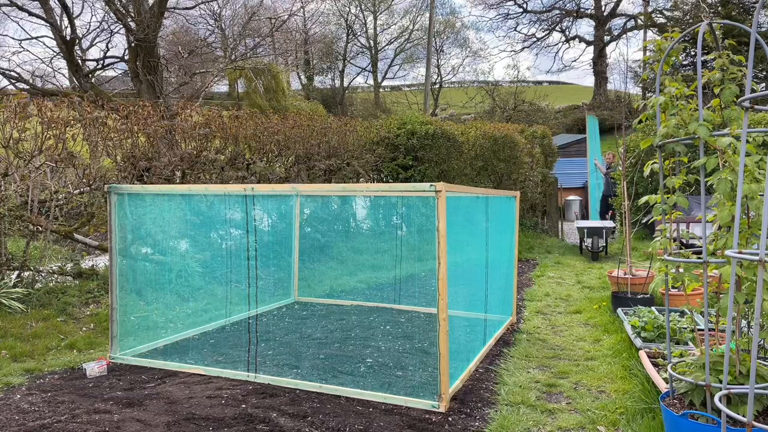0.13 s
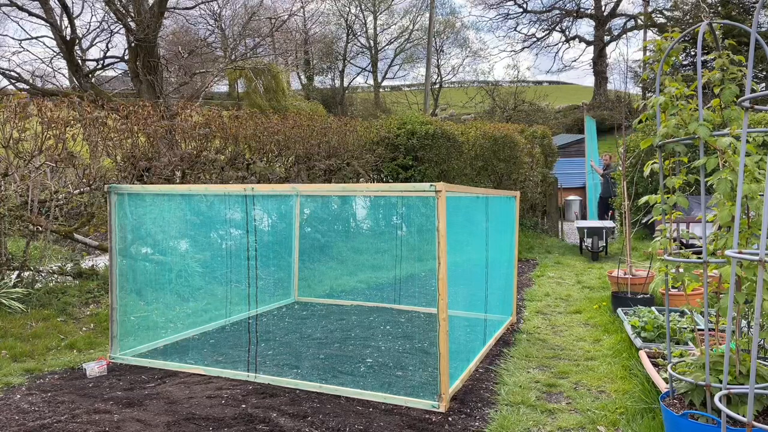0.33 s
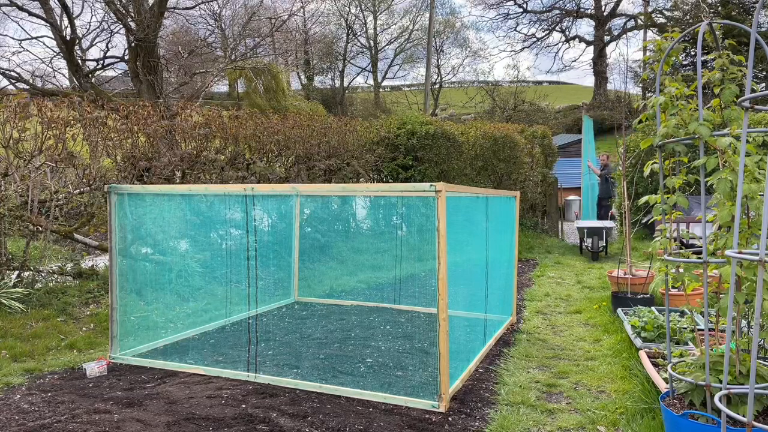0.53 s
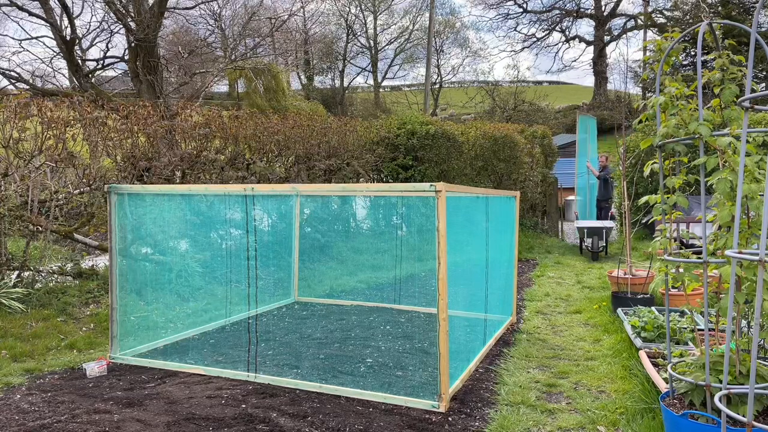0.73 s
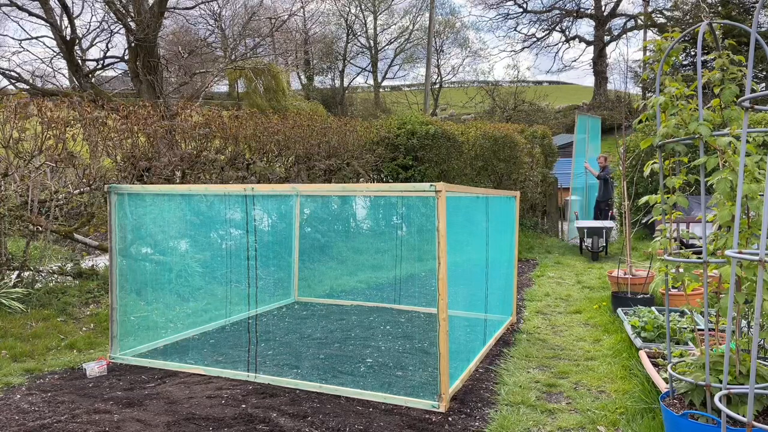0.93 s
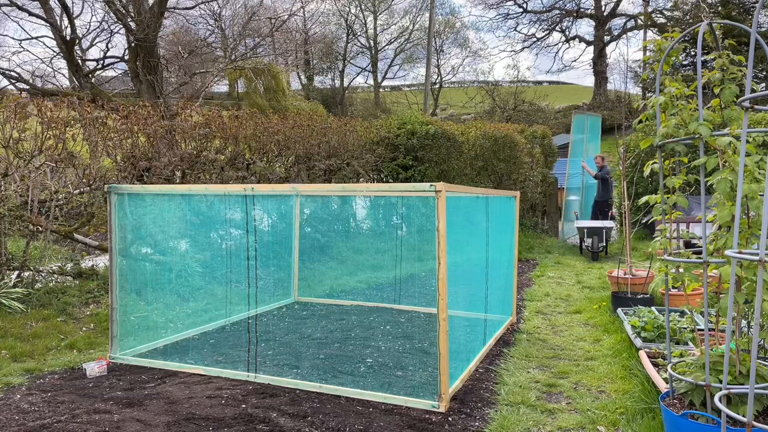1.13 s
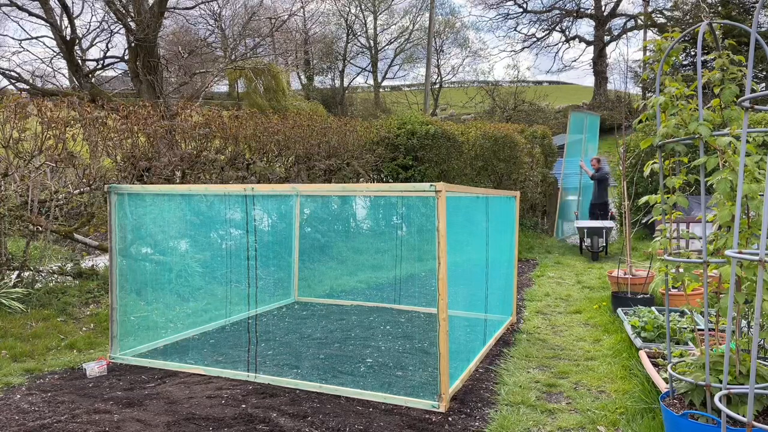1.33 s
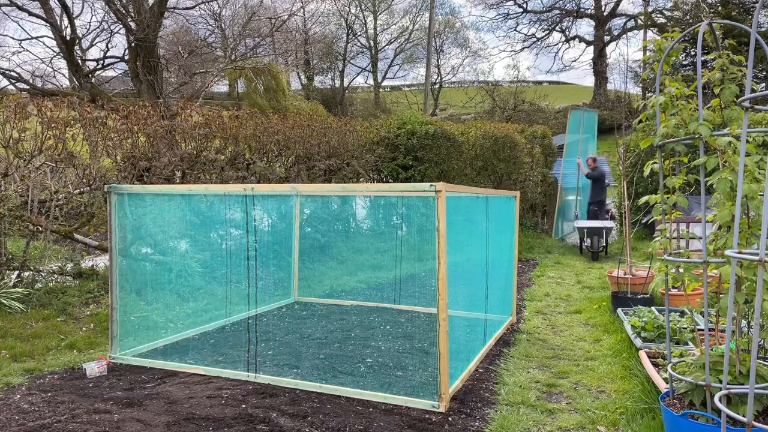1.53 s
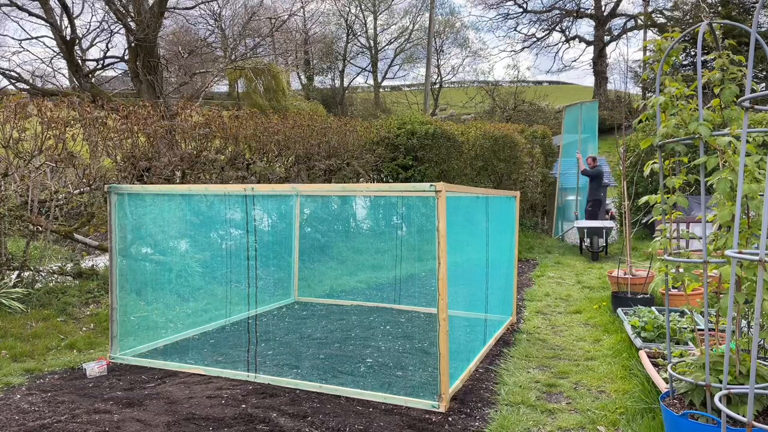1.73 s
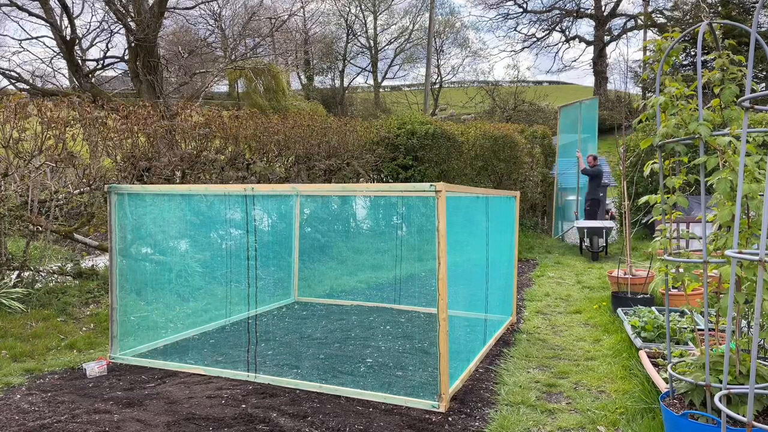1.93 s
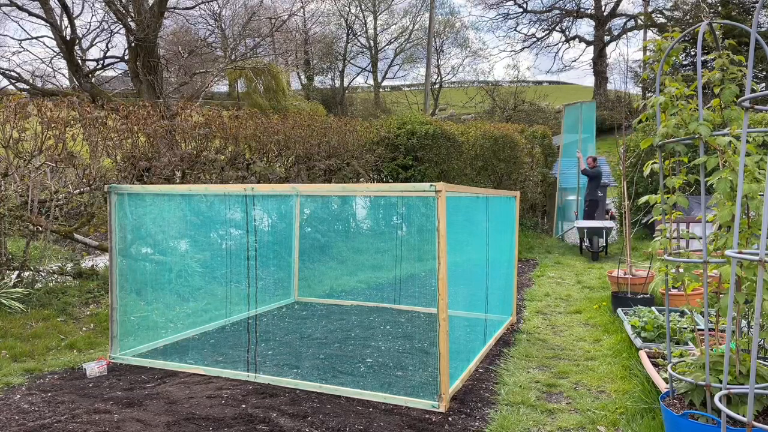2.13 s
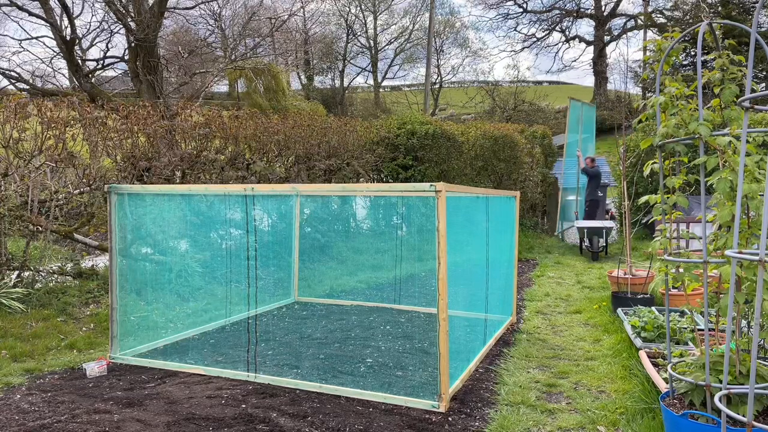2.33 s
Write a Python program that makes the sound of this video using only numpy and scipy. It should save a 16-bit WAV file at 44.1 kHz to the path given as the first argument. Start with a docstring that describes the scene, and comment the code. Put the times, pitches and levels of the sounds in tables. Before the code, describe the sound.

Three short sheep bleats, hoarse and quavering at 1.0-1.25 s, steadier at 1.5-1.85 s, then rattling until about 2.1 s, echo briefly off hedges. Before them, gritty scuffs and dull knocks come close by at 0.22-0.45 and 0.7-0.9 s. Netting swishes and rasps from 1.1 to 2.3 s, with a low thump at 1.7 s. Faint high bird chirps dot the quiet open air, clearest near 2.4 s.

```python
"""Sheep bleat three times across open country, hoarse and quavering, with a short echo from hedges:
pulses of the vocal folds and puffs of noise ring the resonances of throat and mouth.
Closer by, filtered random contacts scuff gritty ground, damped modes ring as dull knocks,
and coloured noise swishes and rasps as netting.
Small birds chirp high and faint as gliding sines, over very quiet air made of shaped noise."""
import sys
import numpy as np
from scipy import signal
from scipy.fft import rfft, irfft, next_fast_len
from scipy.io import wavfile
from scipy.ndimage import map_coordinates

SR = 44100
rng = np.random.default_rng(int(sys.argv[2]) if len(sys.argv) > 2 else 0)


def pcm_store(signal):
    """Save signal as 16-bit PCM."""
    levels = np.round(np.clip(np.atleast_2d(signal), -1, 1) * 32767)
    wavfile.write(sys.argv[1], SR, levels.astype(np.int16).T)


N = 108045
T = np.arange(N) / SR  # s
FFT_SIZE = 2 ** 17  # samples, longer than the scene


def amp(db):
    """Decibel law: 20 dB is a factor of ten in amplitude."""
    return 10 ** (np.asarray(db) / 20)


def unit(x):
    """Normalisation to an rms of 1."""
    return x / np.sqrt(np.mean(x ** 2) + 1e-20)


def along(points, hz):
    """Interpolation of (Hz, value) points on a logarithmic frequency axis."""
    f, v = np.transpose(points)
    return np.interp(np.log(hz + 1), np.log(f + 1), v)


def loudness(rows):
    """Amplitude envelope, linear in dB between (s, dB) points and near silent outside them."""
    return amp(np.interp(T, *np.transpose(rows), left=-140, right=-140))


def decay(t, t60):
    """Exponential decay: 60 dB of fall in t60 seconds."""
    return np.exp(-np.log(1000) * t / t60)


def stroke(start, rise, hold, t60):
    """Contact envelope: linear rise, steady hold and exponential release."""
    attack = np.clip((T - start) / rise, 0, 1)
    return attack * decay(np.maximum(T - start - rise - hold, 0), t60)


def wobble(rate):
    """Random modulation: a smooth curve through random knots, rate knots a second."""
    return map_coordinates(rng.standard_normal(4096), [T * rate + 2], mode="wrap")


def coloured(x, points):
    """Minimum-phase filtering: a folded cepstrum makes the (Hz, dB) gain causal."""
    gain = amp(along(points, np.fft.rfftfreq(FFT_SIZE, 1 / SR)))
    cepstrum = irfft(np.log(gain))
    cepstrum[1:FFT_SIZE // 2] *= 2
    cepstrum[FFT_SIZE // 2 + 1:] = 0
    return irfft(rfft(x, FFT_SIZE) * np.exp(rfft(cepstrum)))[:N]


def patchy(x, depth_db):
    """Spectral variation: random patches in time and frequency, so no two contacts sound alike."""
    spectrum = signal.stft(x, nperseg=512)[2]
    patch = np.outer(np.hanning(9), np.hanning(6))
    field = signal.fftconvolve(rng.standard_normal(spectrum.shape), patch, "same")
    return signal.istft(spectrum * amp(depth_db * unit(field)), nperseg=512)[1][:N]


PATCHY_DB = 2.5
CLUMP_DB, CLUMP_HZ = 3, 138.8  # contacts come in brief clumps


def grains(colour, rate, spread_db, smooth):
    """Granular friction: clumps of tiny random contacts over a smooth rub, rms 1."""
    struck = rng.random(N) < rate / SR  # rate is in contacts a second
    sign = rng.choice([-1, 1], N)
    size = amp(spread_db * np.minimum(rng.exponential(size=N), np.pi))
    rub = patchy(unit(struck * sign * size) + smooth * rng.standard_normal(N), PATCHY_DB)
    clumps = amp(CLUMP_DB * np.tanh(wobble(CLUMP_HZ)))
    return unit(coloured(rub * clumps, colour))


# Decay of the hedges' echo. Each row: frequency in Hz, t60 in seconds.
HEDGE_DECAY = [(200, 0.13), (2000, 0.18), (7000, 0.15)]


def echo(x, wet_db):
    """Diffuse reflection: hedges and trees answer with decaying noise, 5 ms behind the sound."""
    hz, t, z = signal.stft(rng.standard_normal(SR // 2), SR, nperseg=256)
    t60 = along(HEDGE_DECAY, hz)[:, None]
    tail = signal.istft(z * decay(t, t60), SR, nperseg=256)[1]
    response = np.pad(tail, (SR // 200, 0)) / np.linalg.norm(tail)
    return x + amp(wet_db) * signal.fftconvolve(x, response)[:N]


# Spectrum of the air. Each row: frequency in Hz, relative gain in dB.
AIR_COLOUR = [(25, -19), (100, -16), (280, -1.5), (500, -8), (1400, 5.5), (2500, 0), (4200, 5), (5300, -14),
              (7000, -23.5), (8000, -33)]
# Level of the air. Each row: time in seconds, level in dB.
AIR_LOUDNESS = [(0, -71), (.2, -70), (.5, -80.5), (.63, -80.5), (.75, -76), (.96, -81.5), (1.2, -59.5),
                (2.3, -80.5), (2.45, -75)]


def air():
    """Broadband noise: the faint hush of open country."""
    return loudness(AIR_LOUDNESS) * unit(coloured(rng.standard_normal(N), AIR_COLOUR))


# Bird chirps. Each row: start in seconds, length in seconds, start pitch in Hz, end pitch in Hz,
# peak level before the echo in dB.
BIRD_CHIRPS = [(0.0, 0.1, 3720, 3820, -70.5), (0.178, 0.023, 4300, 4450, -52),
               (0.464, 0.032, 4500, 5450, -68.5), (0.581, 0.038, 3500, 4540, -68),
               (.678, 0.037, 3900, 5700, -65.5), (0.924, 0.014, 4100, 4930, -58),
               (.945, 0.016, 4150, 5230, -57), (1.013, 0.033, 3750, 3776, -58),
               (1.037, .14, 5690, 5170, -64), (2.058, 0.013, 4250, 4390, -55),
               (2.378, 0.01, 4050, 4450, -44.5), (2.385, 0.038, 4380, 4406, -43),
               (2.42, 0.067, 4400, 4370, -76)]
CHIRP_BEND = .75  # exponent below 1: the sweep is fastest at its start


def birds():
    """Frequency modulation: thin wavering whistles, most sweeping upward, blurred by the trees."""
    out = np.zeros(N)
    for start, length, start_hz, end_hz, db in BIRD_CHIRPS:
        progress = np.clip((T - start) / length, 0, 1)
        glide = start_hz + (end_hz - start_hz) * progress ** CHIRP_BEND
        hz = glide * (1 + .009 * wobble(400))
        out += amp(db) * np.sin(np.pi * progress) * np.sin(2 * np.pi * np.cumsum(hz) / SR)
    return echo(out, wet_db=-10)


# Dull knocks. Each row: start in seconds, gain in dB, base frequency in Hz, t60 in seconds.
KNOCK_EVENTS = [(.2485, -23, 756, 0.032), (.307, -23.5, 740, 0.04), (.3255, -20, 924, 0.024),
                (.381, -31.5, 1005, 0.054), (.712, -18, 1266, 0.015), (.7515, -37, 1170, 0.022),
                (.822, -22.5, 1156, 0.035), (.828, -29, 767, 0.076), (.894, -11, 1194, 0.013),
                (1.297, -32, 604, 0.11), (1.366, -31.5, 1114, 0.069), (1.686, -25.5, 296, 0.079),
                (2.173, -44, 130, 0.037)]
# Modes of a knock. Each row: ratio to the base frequency, relative level in dB.
MODES = [(.62, -27.5), (1.002, -3.5), (1.198, -13), (1.85, -22.5)]
KNOCK_RISE_S = 0.0029  # time constant


def knocks():
    """Modal vibration: blunt contacts ring a few well-damped modes."""
    out = np.zeros(N)
    for start, db, hz, t60 in KNOCK_EVENTS:
        t = np.maximum(T - start, 0)
        ring = 0
        for ratio, level in MODES:
            mode_hz = hz * ratio * (1 + 0.038 * rng.normal())
            ring = ring + amp(level) * np.sin(2 * np.pi * mode_hz * t)
        out += amp(db) * ring * (1 - np.exp(-t / KNOCK_RISE_S)) * decay(t, t60)
    high_pass = signal.butter(2, 150, "high", fs=SR, output="sos")
    return echo(signal.sosfilt(high_pass, out), wet_db=-26)


# Swishes of netting. Each row: start, rise, hold and t60 in seconds, level in dB.
NET_SWISHES = [(1.21, 0.0096, 0.029, 0.35, -61), (1.275, 0.0033, 0.005, .08, -40),
               (1.298, 0.0021, 0.0025, 0.02, -36.5), (1.298, 0.021, 0.013, 0.4, -45.5),
               (1.334, 0.032, .012, 0.32, -37), (1.401, 0.0069, 0.058, 0.081, -43),
               (1.573, 0.022, 0.073, 0.17, -50.5), (1.685, 0.014, 0.0059, 0.041, -32),
               (1.728, 0.015, 0.081, 0.13, -54.5), (1.893, 0.013, 0.04, 0.066, -56.5),
               (1.976, 0.0069, 0.007, 0.069, -62), (2.239, 0.0093, 0.0075, 0.18, -61)]
# Spectrum of a swish. Each row: frequency in Hz, relative gain in dB.
NET_COLOUR = [(25, -45.5), (110, -25), (200, -5), (600, -14.5), (1100, -2.5), (1400, -10), (2600, -11.5),
              (3200, -2), (3900, 2.5), (4700, -2), (5500, 0), (6200, 4.5), (6900, -0.5), (7600, -21),
              (8200, -31.5)]
# Thin rasps of rubbing mesh. Each row: start, rise, hold and t60 in seconds, centre in Hz, level in dB.
MESH_RASPS = [(0.331, 0.016, 0.048, 0.11, 3250, -55), (0.803, 0.0058, 0.0068, 0.049, 4050, -48),
              (1.107, .015, .02, .12, 4340, -51), (1.112, 0.012, 0.03, 0.1, 3650, -61.5),
              (1.121, 0.012, 0.021, .15, 4670, -58.5), (1.204, 0.035, 0.029, 0.18, 3840, -45.5),
              (1.466, 0.017, 0.034, 0.18, 3930, -47.5), (1.544, 0.0044, .01, 0.055, 2300, -41.5),
              (1.582, 0.0094, 0.033, 0.19, 2570, -44.5), (1.745, 0.027, 0.053, .2, 2840, -49.5),
              (1.831, 0.0072, 0.022, .06, 2260, -39.5), (1.904, .008, 0.019, 0.47, 3610, -50.5),
              (2.009, .015, 0.044, 0.22, 2640, -52), (2.147, 0.0048, 0.0078, 0.16, 6420, -54),
              (2.137, 0.052, 0.0082, 0.073, 3030, -46), (2.207, 0.023, 0.017, 0.05, 3110, -53),
              (2.282, 0.0058, 0.0034, 0.043, 3000, -59)]
# Band shape of a rasp. Each row: ratio to the centre frequency, relative gain in dB.
RASP_BAND = [(.5, -35), (.8, -12.5), (.95, -7), (1, 3.5), (1.04, -8.5), (1.16, -22.5), (1.6, -65)]


def netting():
    """Friction noise: mesh drags in short broad swishes and catches in narrow rasps."""
    drag = sum(amp(db) * stroke(*shape) for *shape, db in NET_SWISHES)
    out = drag * grains(NET_COLOUR, rate=4100, spread_db=7, smooth=0.78)
    flat = [(1000, 0)]
    rub = rfft(grains(flat, rate=500, spread_db=2, smooth=.6), FFT_SIZE)
    grid = np.fft.rfftfreq(FFT_SIZE, 1 / SR)
    for *shape, hz, db in MESH_RASPS:
        band = irfft(rub * amp(along(RASP_BAND, grid / hz)))[:N]
        out += amp(db) * stroke(*shape) * unit(band)
    return out


# Scuffs on gritty ground. Each row: start, rise, hold and t60 in seconds,
# then levels of grit, body and thud in dB.
GROUND_SCUFFS = [(0.0, 0.0019, 0.014, 0.16, -103, -107, -72), (.028, 0.001, 0.0014, 0.032, -56, -97, -95),
                 (0.114, 0.0018, 0.0026, 0.053, -99, -63, -95),
                 (0.222, 0.012, 0.007, 0.3, -42.5, -40.5, -68),
                 (0.25, 0.0024, .034, 0.044, -34.5, -40.5, -53.5),
                 (0.305, 0.00059, 0.0033, 0.086, -37.5, -35, -54.5),
                 (0.314, 0.01, 0.073, 0.19, -69, -43, -69.5), (0.405, 0.031, 0.027, 0.23, -96, -63, -59.5),
                 (0.481, 0.0098, 0.083, 0.068, -86.5, -98.5, -69),
                 (0.71, 0.003, 0.0044, 0.065, -73.5, -48, -93),
                 (0.755, .002, 0.0021, 0.12, -91, -62.5, -87),
                 (0.785, 0.0013, 0.0036, 0.062, -48.5, -43.5, -80),
                 (0.835, 0.0024, 0.014, 0.02, -56.5, -71, -53),
                 (.799, 0.0042, 0.023, 0.16, -57, -44, -68.5), (.874, 0.0037, 0.025, 0.071, -72, -52, -69),
                 (0.907, 0.0017, 0.016, 0.056, -82, -62, -60.5), (0.996, .002, .002, 0.026, -60, -92, -93),
                 (1.032, .06, 0.27, 0.51, -83, -64, -67.5), (1.286, 0.0039, 0.0039, 0.19, -42, -67, -52),
                 (1.401, 0.005, 0.028, 0.17, -42, -75, -49), (1.474, .01, 0.037, 0.036, -56, -58, -62.5),
                 (1.556, 0.038, 0.15, 0.24, -82.5, -62.5, -56.5),
                 (1.684, 0.0036, 0.0078, 0.075, -51, -41, -36.5),
                 (1.71, .003, .008, 0.12, -55.5, -63, -44.5), (1.801, 0.017, 0.013, 0.097, -70, -73, -55.5),
                 (1.979, 0.012, 0.031, 0.9, -71, -81.5, -64), (2.12, 0.015, 0.017, 0.66, -83, -71, -59.5),
                 (2.184, 0.0081, 0.0054, 0.053, -47.5, -51.5, -80),
                 (2.218, 0.007, 0.032, 0.17, -67.5, -67, -86), (2.28, 0.01, 0.033, 0.45, -88, -89, -79.5),
                 (2.376, .003, 0.0031, 0.17, -74, -73, -78.5)]
# Spectrum of fine grit. Each row: frequency in Hz, relative gain in dB.
GRIT_COLOUR = [(1500, -21.5), (2600, 0), (3500, 0), (5000, 2.5), (6400, 5.5), (7100, 0), (7700, -28.5),
               (8200, -21)]
# Spectrum of coarser soil, the body. Each row: frequency in Hz, relative gain in dB.
BODY_COLOUR = [(200, -59), (500, -8.5), (760, 3.5), (1200, 4.5), (1700, 1.5), (2400, -2.5), (3200, -16.5),
               (4500, -34), (7000, -38.5)]
# Spectrum of the ground beneath, the thud. Each row: frequency in Hz, relative gain in dB.
THUD_COLOUR = [(25, -43), (90, -31.5), (150, -11.5), (215, -2), (330, -0.5), (480, -4.5), (800, -20),
               (2000, -59.5)]
GRIT_SPREAD_DB, SOIL_SPREAD_DB = 3, 2  # spread of contact sizes


def scuffs():
    """Granular contact: each scuff crunches fine grit, coarser soil and the ground beneath."""
    layers = sum(amp(np.array(row[4:]))[:, None] * stroke(*row[:4]) for row in GROUND_SCUFFS)
    grit, body, thud = layers
    return (grit * grains(GRIT_COLOUR, rate=1700, spread_db=GRIT_SPREAD_DB, smooth=0.6)
            + body * grains(BODY_COLOUR, rate=900, spread_db=SOIL_SPREAD_DB, smooth=0.71)
            + thud * grains(THUD_COLOUR, rate=600, spread_db=SOIL_SPREAD_DB, smooth=0.33))


NEAR_DB, NEAR_T60_S = -2.5, 0.016  # scatter from nearby ground and twigs smears each pulse


def scattered(x):
    """Early reflection: a dense cluster of very short delays joins the direct sound."""
    t = T[:SR // 25]
    cluster = rng.standard_normal(len(t)) * decay(t, NEAR_T60_S)
    return x + amp(NEAR_DB) * signal.fftconvolve(x, cluster / np.linalg.norm(cluster))[:N]


def fold_pulses(cycles, scatter_db):
    """Band-limited impulses: one of uneven size per fold cycle, placed between samples."""
    at = np.interp(np.arange(1, int(cycles[-1])), cycles, np.arange(N))  # in samples
    taps = at.astype(int)[:, None] + np.arange(-7, 9)
    offset = taps - at[:, None]
    size = amp(scatter_db * rng.standard_normal(1024)[:len(at), None])
    kernel = size * np.sinc(offset) * np.sinc(offset / 8)  # windowed sinc
    return np.bincount(np.clip(taps, 0, N - 1).ravel(), kernel.ravel(), N)


SPLIT_HZ = 1020  # the lowest resonance lies below, the rest of the voice above


def bleat(level, low_level, pitch, throat, jitter, rough, scatter_db, wet_db):
    """Source and filter: uneven pulses of the vocal folds, each with a puff of noise, ring the throat."""
    hz = np.interp(T, *np.transpose(pitch)) * (1 + jitter * wobble(110))
    cycles = np.cumsum(hz) / SR
    pulses = fold_pulses(cycles, scatter_db)
    puffs = rng.standard_normal(N) * np.exp(-3 * (cycles % 1))
    source = np.sqrt(1 - rough) * unit(pulses) + np.sqrt(rough) * unit(puffs)  # rough: power share
    voice = coloured(scattered(source), throat)
    low_pass = signal.butter(8, SPLIT_HZ, fs=SR, output="sos")
    low = signal.sosfiltfilt(low_pass, voice)
    high = voice - low
    return echo(unit(high) * loudness(level) + unit(low) * loudness(low_level), wet_db)


# Bleat above the split, before the echo. Each row: time in seconds, level in dB.
HIGH_LEVEL_1 = [(.98, -69), (1.008, -46.5), (1.024, -42.5), (1.074, -56), (1.086, -36), (1.124, -37.5),
                (1.138, -57.5), (1.149, -28.5), (1.17, -38.5), (1.182, -32), (1.202, -36.5), (1.225, -68),
                (1.27, -78.5)]
HIGH_LEVEL_2 = [(1.52, -54), (1.546, -42), (1.556, -34), (1.57, -48), (1.605, -40), (1.613, -38),
                (1.63, -43.5), (1.69, -41.5), (1.718, -52.5), (1.73, -40), (1.745, -47), (1.772, -45),
                (1.79, -60.5), (1.825, -43), (1.85, -58.5)]
HIGH_LEVEL_3 = [(1.822, -50), (1.85, -39), (1.878, -33), (1.932, -45), (1.974, -34), (1.99, -42),
                (2.03, -57.5), (2.07, -71), (2.14, -56)]
# Lowest resonance of each bleat, before the echo. Each row: time in seconds, level in dB.
LOW_LEVEL_1 = [(1.0, -76), (1.025, -79.5), (1.075, -65), (1.11, -56), (1.135, -50), (1.18, -57),
               (1.21, -49), (1.25, -52.5), (1.275, -88.5)]
LOW_LEVEL_2 = [(1.549, -68.5), (1.58, -60), (1.671, -76), (1.73, -57.5), (1.77, -48), (1.83, -58.5),
               (1.86, -67)]
LOW_LEVEL_3 = [(1.83, -57), (1.86, -55), (1.93, -59.5), (1.97, -61.5), (2.02, -54.5), (2.045, -84.5),
               (2.12, -77)]
# Vocal fold rate before jitter. Each row: time in seconds, pitch in Hz.
FOLD_PITCH_1 = [(.98, 121.9), (1.031, 133.6), (1.089, 143.1), (1.15, 148.6), (1.2, 153.3), (1.262, 163.5)]
FOLD_PITCH_2 = [(1.52, 155.8), (1.578, 161.1), (1.681, 162.1), (1.759, 159.2), (1.841, 152.5)]
FOLD_PITCH_3 = [(1.822, 146.4), (1.882, 151.3), (1.92, 141.1), (1.964, 144.9), (2.018, 138.5),
                (2.14, 134.6)]
# Throat and mouth resonances. Each row: frequency in Hz, relative gain in dB.
RESONANCES_1 = [(150, -42), (300, -35), (520, -38), (620, -22.5), (700, -14), (830, -16), (880, -20),
                (970, -32.5), (1300, -11), (1680, -3), (1850, -4.5), (2100, 0), (2750, -6), (3050, -20.5),
                (3800, -31.5), (4300, -37), (5300, -35.5), (6500, -63)]
RESONANCES_2 = [(60, -62.5), (150, -42), (300, -18.5), (520, -29), (780, -8), (980, -30), (1280, -12),
                (1450, -8), (1620, 2), (1750, -11), (1950, -19.5), (2280, -0.5), (2650, -15.5),
                (3000, -16.5), (3700, -14.5), (5000, -33.5), (6500, -61)]
RESONANCES_3 = [(150, -36), (300, -25.5), (520, -23.5), (760, -11), (950, -44), (1250, -11.5), (1550, -3.5),
                (1680, 1.5), (1900, -12.5), (2380, 6.5), (2800, 0.5), (3050, -5), (3700, -22),
                (4500, -36.5), (6500, -85.5)]


def sheep():
    """Voiced sound with jitter: a hoarse quavering bleat, a steadier one, and a rattling one."""
    hoarse = bleat(HIGH_LEVEL_1, LOW_LEVEL_1, FOLD_PITCH_1, RESONANCES_1,
                   jitter=.022, rough=.36, scatter_db=2.5, wet_db=-4.5)
    steadier = bleat(HIGH_LEVEL_2, LOW_LEVEL_2, FOLD_PITCH_2, RESONANCES_2,
                     jitter=.004, rough=.2, scatter_db=3, wet_db=1)
    rattling = bleat(HIGH_LEVEL_3, LOW_LEVEL_3, FOLD_PITCH_3, RESONANCES_3,
                     jitter=.012, rough=.2, scatter_db=3, wet_db=-7)
    return hoarse + steadier + rattling


def scene():
    """Superposition: the sources add as one channel."""
    return (sheep() + scuffs() + netting() + knocks() + birds() + air())[None]


TOP_HZ = 8080  # centre of the band edge


def record(dry):
    """Band limitation: the treble falls away over 500 Hz around the band edge."""
    m = next_fast_len(N + SR // 2)
    hz = np.fft.rfftfreq(m, 1 / SR)
    gain = np.clip((TOP_HZ - hz) / 500 + .5, 0, 1) ** 2
    return irfft(rfft(dry, m) * gain, m)[..., :N]


dry = scene()
out = record(dry)
pcm_store(out)
```